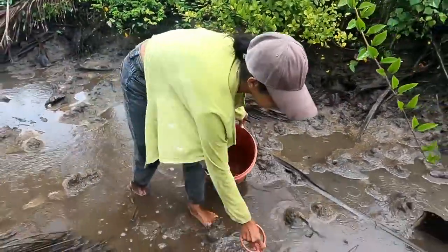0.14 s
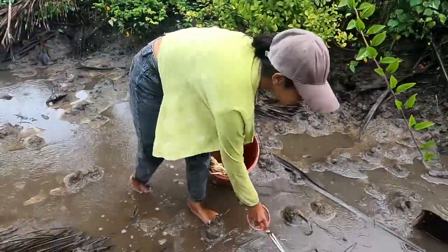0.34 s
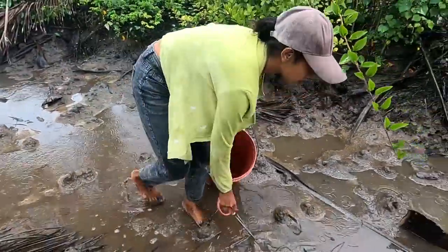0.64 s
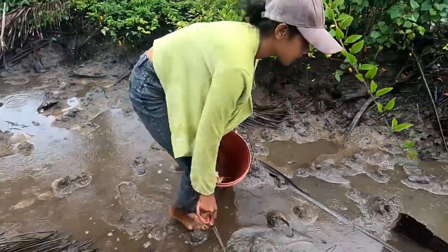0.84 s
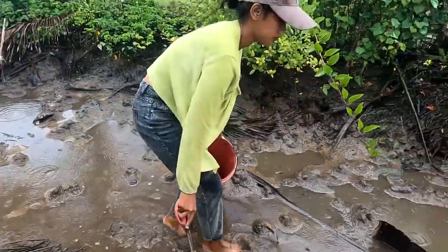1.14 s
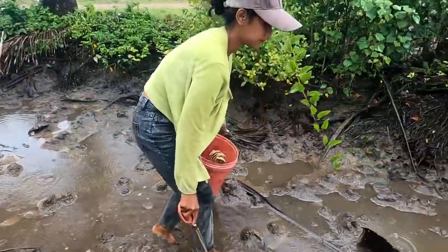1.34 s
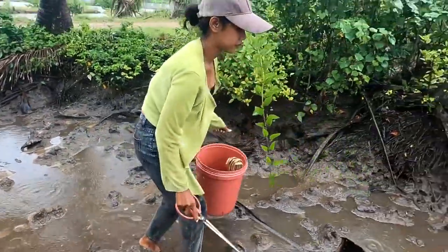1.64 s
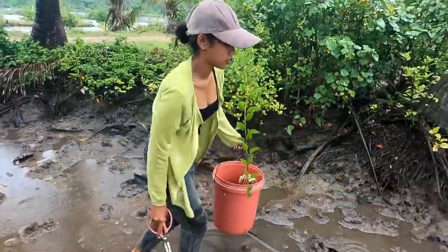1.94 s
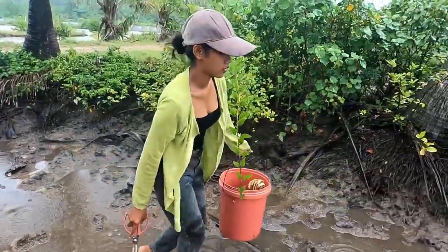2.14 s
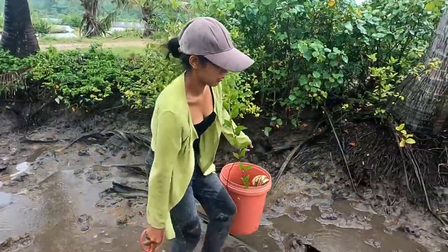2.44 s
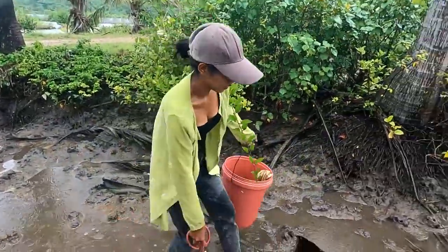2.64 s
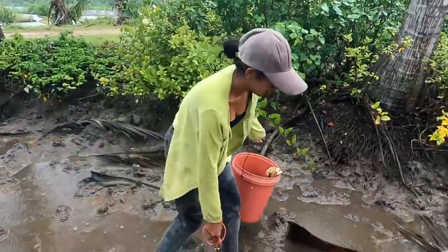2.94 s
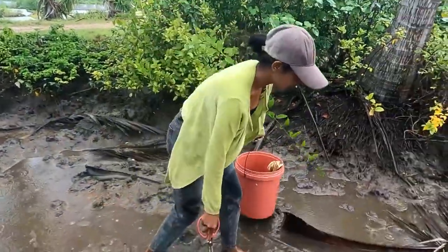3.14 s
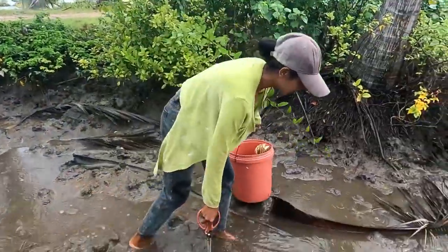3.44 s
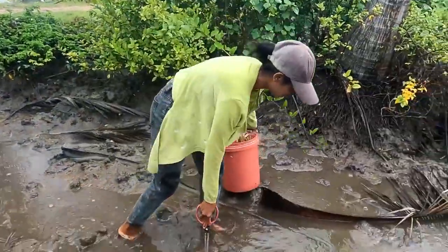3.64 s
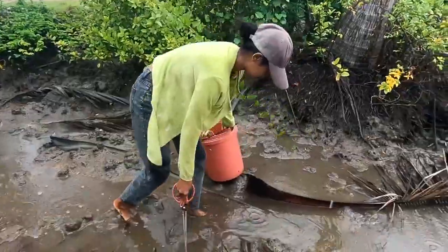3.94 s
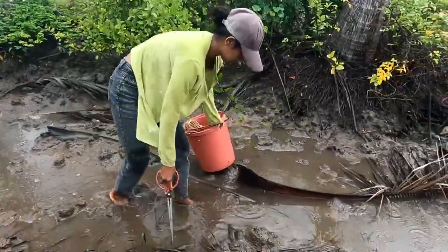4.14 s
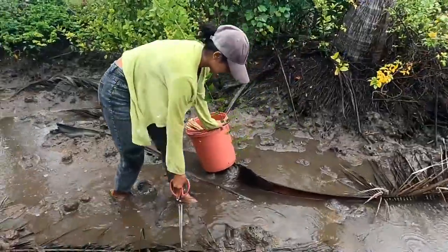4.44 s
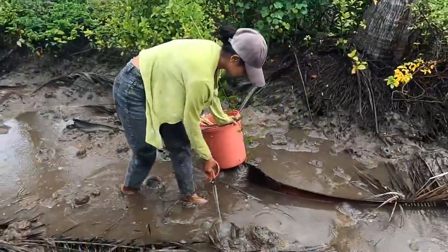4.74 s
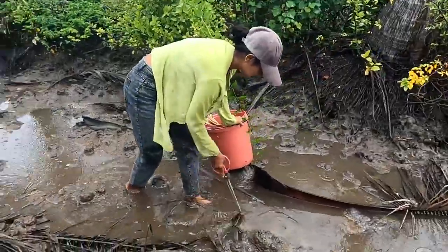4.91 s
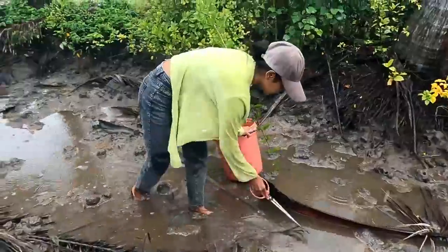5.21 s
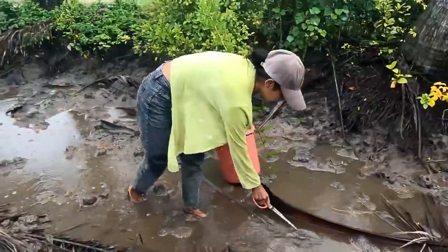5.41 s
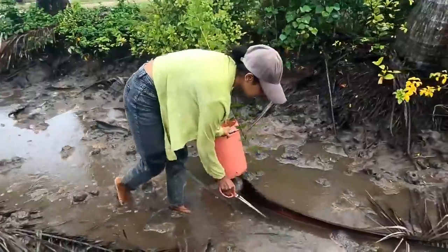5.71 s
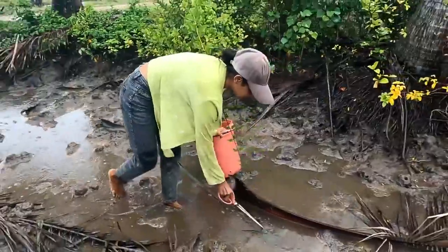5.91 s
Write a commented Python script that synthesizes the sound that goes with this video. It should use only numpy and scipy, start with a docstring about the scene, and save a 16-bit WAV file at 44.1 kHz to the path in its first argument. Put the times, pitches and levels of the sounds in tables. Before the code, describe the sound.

Sharp, irregular ticks sound right at the microphone as drops and slipping fingers strike a small camera's plastic housing, each with a brief ring. A hand rubs and bumps the casing now and then, with the hardest bump late on. Wind rumbles and flutters against the microphone throughout. Behind it, soft rain hisses on mud, water and leaves in an outdoor swamp, and a few small bubbles burst in puddles.

```python
"""Sharp plastic ticks, rubbing and bumps, over rumbling wind and rain on a muddy swamp.
Drops and slipping fingers tick on a small hand-held camera and make its plastic housing ring.
The hand also rubs and bumps the housing, and wind pushes on its two microphone openings (ports).
Behind that, bubbles burst in the puddles and rain hisses on mud, water and leaves."""
import sys
import numpy as np
from scipy import signal
from scipy.io import wavfile
from scipy.ndimage import uniform_filter1d

SR = 44100
rng = np.random.default_rng(int(sys.argv[2]) if len(sys.argv) > 2 else 0)


def to_wav(sig):
    """Store sig (one row per channel, or 1-D mono) as 16-bit WAV at the path in sys.argv[1].

    Samples outside -1..1 are clipped; the rate is SR.
    """
    pcm = np.clip(np.atleast_2d(sig), -1, 1) * 32767
    pcm = np.round(pcm).astype(np.int16)
    wavfile.write(sys.argv[1], SR, pcm.T)  # frames by channels


N = 267687

# The housing's modes, the tones it rings at. Each row: pitch in Hz, level in dB, seconds to fade
# by 60 dB, dB gained per dB of ring in the loose panel, lean to the left in dB.
HOUSING_MODES = [(324.4, -15, 0.062, 0.5, -0.5), (695.5, 3.5, 0.039, 1.6, -3), (1024, 8, 0.087, 3.5, -5.5),
                 (1310, 8, 0.021, 1.5, 4.5), (1450, 3.5, 0.016, 1, 6.5), (1974, 4.5, 0.036, 2.7, 5.5),
                 (2203, 3, 0.032, 2.6, -5.5), (2400, 19, 0.0052, 0.5, -1.5), (2900, -3.5, 0.023, 2.6, 6.5),
                 (3700, 6.5, 0.01, 1.78, -4), (4500, 3, 0.015, 2.5, -4), (5610, -3.5, 0.014, 2, 0.5),
                 (6070, 0.5, 0.0039, 1.5, 3)]
# Pitches in Hz sort the modes into six families: low, ringing, hollow, middle, snapping, bright.
FAMILY = np.searchsorted([900, 1100, 1700, 2300, 2600], np.transpose(HOUSING_MODES)[0])


def housing_ticks(modes):
    """Drops and finger slips strike the housing; a harder hit wakes more of its high tones."""
    # Each row: start in seconds, strength in dB, hardness in dB, ring of the loose panel in dB,
    # pitch the struck spot favours in Hz, pitch the grip mutes in Hz, lean to the left in dB.
    hits = [(0.0254, -31.5, -18, -4, 1060, 1450, -0.5), (0.0315, -38.5, -2, -6, 2060, 1026, 1),
            (0.0673, -25.5, 6, -17.5, 1535, 2290, 5), (0.312, -30, -4, -4.5, 980, 2150, -0.5),
            (0.393, -34, -7, 1.5, 2160, 730, -1.5), (0.631, -59.5, 6.5, -3, 4500, 1300, -6),
            (0.6394, -44, 3.5, -4, 1460, 3700, 3.5), (0.8724, -27.5, -11.5, -3.5, 1242, 2280, 0.5),
            (0.8866, -19, -2.5, -14, 2580, 696, 1.5), (0.945, -44, -20, -3, 1210, 700, -2),
            (1.132, -36, -1, -9, 1450, 3700, 3.5), (1.277, -39, -11, -3, 1150, 704, 3),
            (1.3245, -27, -8, -8, 1283, 700, 1), (1.4875, -34.5, -3.5, -5, 1364, 3700, 4),
            (1.691, -33.5, -3.5, -9.5, 2900, 1250, 0), (2.003, -43, -1, -8.5, 2550, 3700, 4),
            (2.0848, -45, 9.5, -3, 4890, 1820, 0.5), (2.563, -37, 3.5, -5.5, 670, 2330, 0.5),
            (2.721, -48.5, 0, 4.5, 2900, 1890, 2.5), (2.8598, -45.5, -7, -2, 2080, 700, 2.5),
            (3.1475, -37.5, 7.5, -3, 4700, 4500, -3), (3.2234, -38, -29, -2, 1070, 1450, -1),
            (3.2667, -40.5, -1, -1, 2000, 1120, 2), (3.2894, -32.5, 2.5, 0.5, 5100, 5600, 2),
            (3.417, -34.5, 3.5, -3, 4220, 720, 1), (4.039, -56, 2, -1.5, 1370, 710, 0),
            (4.1317, -32, 0.5, -8.5, 1320, 3700, 0.5), (4.3375, -31.5, 9.5, -9, 3800, 5300, -3),
            (4.5641, -43.5, -3.5, -3.5, 1950, 700, 2), (4.7042, -69.5, 15, 0.5, 5240, 3700, -0.5),
            (5.5492, -58, 7, -3.5, 6000, 1960, 2), (5.62, -60.5, 11.5, 1, 2160, 1310, 0),
            (5.7674, -39.5, -7.5, -6, 1900, 4500, 3.5), (5.889, -33, 2, -19.5, 1780, 2400, 0),
            (6.0482, -59, 20, -11, 5870, 2600, 0.5)]
    family_db = np.array([-1, -2, 4.5, 5.0, 0.5, 8.5])  # Each entry: one family's level in dB.
    hard_share = np.array([-0.077, 0.35, 0.042, 0.59, 1.39, 1.485])  # Each entry: the dB one family gains per dB of hardness.
    t, out = np.arange(1400) / SR, np.zeros((2, N))
    hz, _, _, panel, _ = np.transpose(HOUSING_MODES)
    samples = np.arange(modes.shape[-1])
    spot_cycles = 18  # the struck spot's own ring fades by 60 dB in this many cycles
    for start, db, hard_db, panel_db, spot_hz, mute_hz, pan_db in hits:
        force = contact_force(t, db + max(hard_db, 0))
        struck_db = db + (family_db + hard_db * hard_share)[FAMILY]
        lift_db = 4.5 * near_pitch(hz, spot_hz, octaves=0.097)
        mute_db = -13.5 * near_pitch(hz, mute_hz, octaves=0.13)
        scatter_db = rng.standard_normal((2, len(hz)))
        mode_gain = amp(struck_db + panel_db * panel + lift_db + mute_db + scatter_db)
        ring = (mode_gain.T[:, :, None] * modes).sum(0)
        detune = 1 + 0.004 * rng.standard_normal()  # the grip shifts all modes a little
        ring = np.array([np.interp(samples * detune, samples, port) for port in ring])
        spot_db = np.interp(spot_hz, hz, struck_db) + min(panel_db, 0) + 8
        spot_fade = amp(spot_db - 60 * t * spot_hz / spot_cycles)
        ring[:, :len(t)] += spot_fade * np.sin(2 * np.pi * spot_hz * t)
        ring[:, :2] += amp(db + hard_db - 16) * np.array([1, -1])  # the click of the contact itself
        add(out, start - 0.0004, amp(-4.5) * sides(pan_db) * signal.fftconvolve(ring, force[None]))
    return out


def contact_force(t, firmness_db):
    """One sharp touch, then ragged chatter and rattling seams; weak hits chatter longer."""
    firm_db, rattle_s = -33.5, 0.0093
    chatter_s = 0.0022 * amp(0.29 * max(firm_db - firmness_db, 0))
    touch = np.exp(-((t - 0.0003) / 0.000028) ** 2)
    ragged = rng.standard_normal(len(t)) * np.minimum(t / 0.00038, 1)
    chatter = 0.14 * np.exp(-t / chatter_s)
    rattle = amp(-32) * np.exp(-t / rattle_s)
    force = touch + ragged * (chatter + rattle)
    return force / np.linalg.norm(force)


def housing_rings():
    """Each mode answers a blow with a dry crack, then a thinner ring, out of step at the two ports."""
    t = np.arange(4000) / SR
    hz, db, fade_s, _, lean_db = np.transpose(HOUSING_MODES)[:, :, None, None]
    phase = 0.34 * np.cos(np.pi * np.arange(len(hz)))[:, None, None] * [[1], [-1]]
    lean = amp(lean_db / 2 * [[1], [-1]])
    onset = 1 - np.exp(-t * hz * 0.56)
    crack = 1 + 3.01 * np.exp(-t * hz / 7)
    return lean * onset * crack * amp(db - 60 * t / fade_s) * np.sin(2 * np.pi * hz * t + phase)


def hand_rub(modes):
    """Skin sticks and slips, a grainy force that rings the housing while the hand damps it."""
    # Each row: strongest moment in seconds, level in dB, swell in seconds, fade in seconds.
    strokes = [(0.01, -44.5, 0.085, 0.15), (.92, -55, 0.21, 0.19), (1.29, -55, 0.086, 0.078),
               (1.556, -37.5, 0.24, 0.11), (3.23, -52, 0.021, 0.23), (3.37, -53, 0.14, 0.059),
               (3.7, -52, 0.055, 0.052), (4.163, -45, 0.071, 0.015)]
    family_db = [-4, -7, -0.5, -13.5, -8.5, -13]  # Each entry: one family's level in dB when rubbed.
    damping_s, pitch_wobble = 0.085, 0.025
    level = sum(stroke_level(*row) for row in strokes)
    grain_db = 3.8 * np.minimum(rng.exponential(1, N // 64 + 1), 2.5)
    slips = rng.standard_normal((2, N)) * amp(np.repeat(grain_db, 64)[:N])
    shell = (amp(family_db)[FAMILY][:, None, None] * modes).sum(0)
    damping = amp(-60 * np.arange(shell.shape[1]) / SR / damping_s)
    shell = shell * damping + amp(17) * modes[0]  # the lowest mode rings on
    ring = signal.oaconvolve(level * unit_level(slips[:1]), shell, axes=1)[:, :N]
    # The changing grip bends the pitch.
    grip = unit_level(uniform_filter1d(uniform_filter1d(rng.standard_normal(N), size=900), size=900))
    drift = np.cumsum(pitch_wobble * grip)
    bent_samples = np.arange(N) + drift - uniform_filter1d(drift, size=4000)
    ring = np.array([np.interp(bent_samples, np.arange(N), port) for port in ring])
    palm_band = signal.butter(2, [120, 400], "band", fs=SR)
    palm_shove = signal.lfilter(*palm_band, level * unit_level(slips[1]))
    return amp(-28.5) * ring + amp(13) * palm_shove


def stroke_level(top_s, db, swell_s, fade_s):
    """One stroke of the skin swells to its top and fades."""
    t = np.arange(N) / SR - top_s
    return amp(db - 24.5 * np.where(t < 0, -t / swell_s, t / fade_s) ** 1.18)


def hand_bumps(modes):
    """A push drops quickly in pitch as bending waves spread, and the lowest mode knocks."""
    # Each row: start in seconds, push in dB, knock in dB, lean to the left in dB.
    bumps = [(0.522, -39, -33.5, 1), (1.688, -27, -27, 0.5), (2.209, -50.5, -37.5, 1),
             (3.225, -36, -23.5, 2), (4.514, -36.5, -29, 1.5), (4.7001, -30.5, -56, -14),
             (4.7045, -16.5, -40, -11), (4.766, -32.5, -31, 1), (4.806, -35, -46, -11),
             (5.142, -40.5, -50, -11), (5.686, -34.5, -42, -13.5), (5.975, -43.5, -36, -1)]
    t, out = np.arange(4000) / SR, np.zeros((2, N))
    hz = 40 + 130 * np.exp(-t / 0.015) + 1100 * np.exp(-t / 0.00062)
    push = -glide(hz) * (hz / 130) ** -0.3 * amp(-60 * t / 0.099)
    for start, push_db, knock_db, pan_db in bumps:
        add(out, start, sides(pan_db) * (amp(push_db) * push + amp(knock_db) * modes[0]))
    return out


def wind():
    """Lumpy air pressure rumbles and flutters, nearly the same on both ports."""
    # Each row: time in seconds, deep rumble in dB, flutter in dB.
    gusts = [(0.0, -31.5, -40), (0.45, -25.5, -38.5), (0.68, -33, -45), (1.0, -27.5, -33),
             (1.15, -28.5, -43), (1.49, -29, -33.5), (2.3, -32.5, -42), (2.55, -24.5, -34),
             (3.01, -32.5, -47), (3.28, -29.5, -27.5), (3.69, -33, -44), (4.18, -35.5, -39),
             (4.68, -35, -38), (5.02, -30, -43), (6.07, -34, -40)]
    # The tone colours of the two layers. Each row: pitch in Hz, relative level in dB.
    rumble_colour = [(8, -12), (18, 5), (33, 5), (52, 1.5), (68, -13), (120, -84)]
    flutter_colour = [(45, -51.5), (68, -2), (97, 11.5), (120, -18), (145, -25.5), (220, -27), (700, -63.5)]
    rumble_gain, flutter_gain = gain_curves(gusts)
    rumble = noise(rumble_colour, lambda hz: 1, size=4096, patchy_db=1, flicker_db=1.7)
    flutter = noise(flutter_colour, lambda hz: 1.015 - hz / 4000, size=2048, patchy_db=0.5, flicker_db=4)
    return rumble_gain * rumble + flutter_gain * flutter


def puddle_bubbles():
    """A bubble's pitch rises as it nears the surface, more for big, low ones; spray roughens it."""
    # Each row: start in seconds, level in dB, starting pitch in Hz.
    bursts = [(0.647, -39, 3030), (0.674, -42, 3020), (2.316, -44, 1290), (2.673, -42, 2980),
              (3.866, -42.5, 2400), (4.532, -46, 1530), (5.046, -48, 2340), (5.306, -43, 2920)]
    steady_hz = 3570  # bubbles above this pitch do not rise
    progress, out = np.arange(600) / 600, np.zeros((2, N))
    swell = np.sin(np.pi * progress ** 0.43) ** 2
    for start, db, hz in bursts:
        spray = 1 + 4 * signal.lfilter(*signal.butter(2, 1100, fs=SR), rng.standard_normal(len(swell)))
        rise_octaves = 0.94 * max(np.log2(steady_hz / hz), 0) ** 2
        add(out, start, amp(db) * spray * swell * glide(hz * 2 ** (rise_octaves * progress)))
    return out


def rain():
    """Far rain blurs into a hiss; each nearer drop rings a small bubble for a few cycles."""
    # Each row: time in seconds, level of the rain in dB.
    levels = [(0.0, -55), (0.25, -49.5), (1.1, -55.5), (3.45, -56.5), (3.75, -54), (5.32, -58),
              (6.07, -55.5)]
    # The hiss as the hollows of the ports colour it. Each row: pitch in Hz, relative level in dB.
    colour = [(300, -13), (880, -20.5), (1020, -4), (1500, -9), (2290, -3.5), (2700, -8), (3050, 0),
              (3300, -11.5), (3900, -11.5), (4650, -4.5), (5500, -11), (7850, -18), (8400, -28.5),
              (12000, -41)]
    # Each row: pitch in Hz, how alike left and right are (1 means the same).
    likeness = [(240, 0.47), (470, 0.062), (3700, 0.73)]
    drops_per_s = 90
    hiss = noise(colour, lambda hz: at_pitch(likeness, hz), size=512, patchy_db=2, flicker_db=1.5)
    t, drops = np.arange(500) / SR, np.zeros((2, N))
    strength = amp(2 * np.minimum(rng.exponential(1, N), 4))
    impacts = strength * (rng.random(N) < drops_per_s / SR)
    pitch_index = rng.integers(0, 16, N)
    onset = 1 - np.exp(-t / 0.0013)
    for k, hz in enumerate(np.geomspace(1100, 7000, num=16)):
        plip = onset * np.sin(2 * np.pi * hz * t * (1 + 12 * t)) * np.exp(-t * hz / 2.5)
        plips = signal.oaconvolve(impacts * (pitch_index == k), plip)[:N]
        drops += sides(pan_db=3) * amp(0.35 * at_pitch(colour, hz)) * plips
    return gain_curves(levels)[0] * (hiss + amp(-10.5) * unit_level(drops))


def noise(colour, likeness, size, patchy_db, flicker_db):
    """Left and right noise that wavers in small patches of pitch and flickers as a whole."""
    hop = size // 4
    frames, hz = N // hop + 5, np.fft.rfftfreq(size, 1 / SR)
    a, b, c, d, patches = rng.standard_normal((frames, len(hz), 5)).T
    patches = unit_level(uniform_filter1d(uniform_filter1d(patches, size=6, axis=0), size=8, axis=1))
    flicker = unit_level(uniform_filter1d(rng.exponential(1, frames) - 1, size=3))
    alike = np.clip(likeness(hz[:, None]), -1, 1)
    left = a + 1j * b
    right = alike * left + np.sqrt(1 - alike ** 2) * (c + 1j * d)
    gain = amp(at_pitch(colour, hz)[:, None] + patchy_db * patches + flicker_db * flicker)
    _, sound = signal.istft(gain * np.array([left, right]), nperseg=size, noverlap=size - hop)
    return unit_level(sound[:, :N])


def amp(db):
    """Turns decibels into a gain."""
    return 10 ** (np.asarray(db) / 20)


def unit_level(x):
    """Scales a signal to an average power of 1."""
    return x / np.sqrt(np.mean(x ** 2) + 1e-20)


def glide(hz):
    """A tone that follows a changing pitch."""
    return np.sin(2 * np.pi * np.cumsum(hz) / SR)


def near_pitch(hz, centre_hz, octaves):
    """A bell curve: 1 at the centre pitch, falling to 0 away from it."""
    return np.exp(-(np.log2(hz / centre_hz) / octaves) ** 2)


def at_pitch(rows, hz):
    """Reads between a table's rows, with octaves evenly spaced."""
    row_hz, value = np.transpose(rows)
    return np.interp(np.log(hz + 1), np.log(row_hz + 1), value)


def gain_curves(rows):
    """Turns dB columns over time into gains at every sample, silent outside the rows."""
    seconds, *columns = np.transpose(rows)
    return [amp(np.interp(np.arange(N) / SR, seconds, db, left=-200, right=-200)) for db in columns]


def add(mix, start_s, sound):
    """Mixes a sound in at its start time."""
    part = mix[..., round(start_s * SR):][..., :sound.shape[-1]]
    part += sound[..., :part.shape[-1]]


def sides(pan_db):
    """Left and right gains; positive leans left."""
    return amp([[pan_db / 2], [-pan_db / 2]])


def scene():
    """All sources at the two ports."""
    modes = housing_rings()
    return housing_ticks(modes) + hand_rub(modes) + hand_bumps(modes) + puddle_bubbles() + wind() + rain()


def record(dry):
    """The microphones soften the treble, gain control dips after loud ticks, and the top is cut off."""
    soften_hz, cutoff_hz = 8200, 12800
    threshold_db, recovery_db_per_s, dip_share = -21, 9.7, 0.2
    heard = signal.lfilter(*signal.butter(3, soften_hz, fs=SR), dry)
    power_db = 10 * np.log10(abs(uniform_filter1d((heard ** 2).mean(0), size=130)) + 1e-12)
    fall_db = np.arange(N) * recovery_db_per_s / SR
    held_db = np.maximum.accumulate(power_db + fall_db) - fall_db  # jumps to each peak, then sinks
    over_db = np.maximum(held_db - threshold_db, 0)
    late_db = uniform_filter1d(np.roll(over_db, shift=260), size=200)  # reacts after the tick has passed
    treble_cut = signal.firwin(511, cutoff_hz, window=("kaiser", 9), fs=SR)
    return signal.oaconvolve(heard / amp(dip_share * late_db), treble_cut[None], "same")


dry = scene()
out = record(dry)
to_wav(out)
```